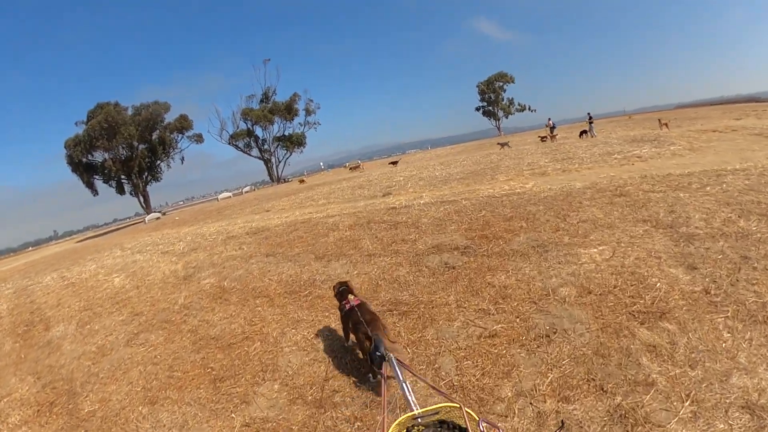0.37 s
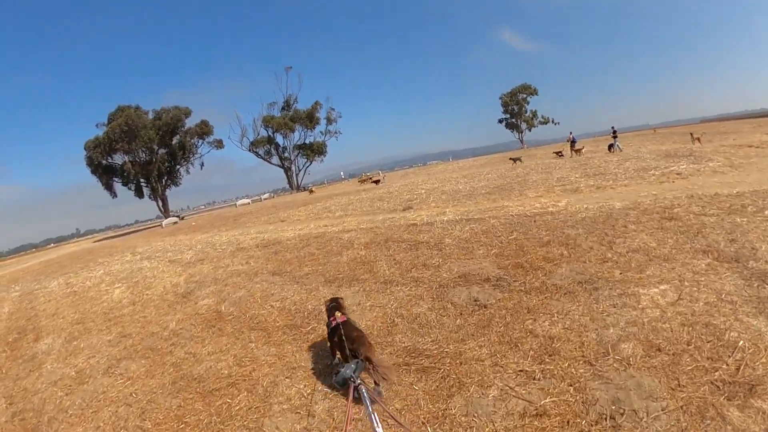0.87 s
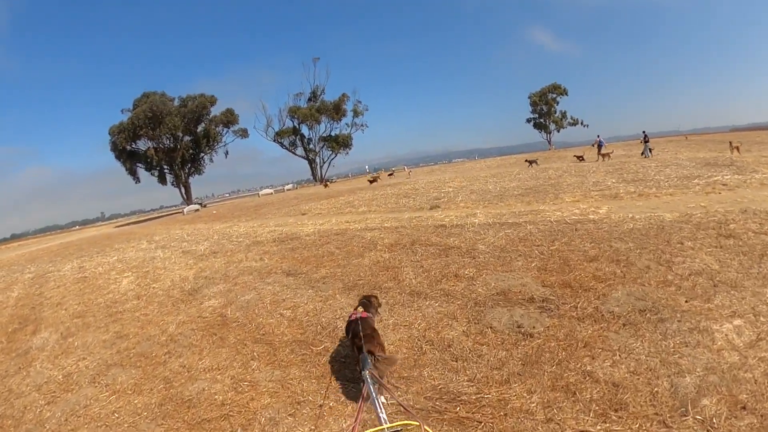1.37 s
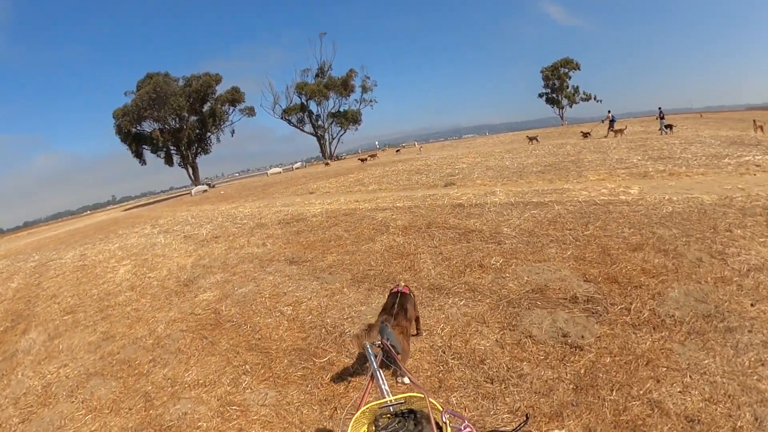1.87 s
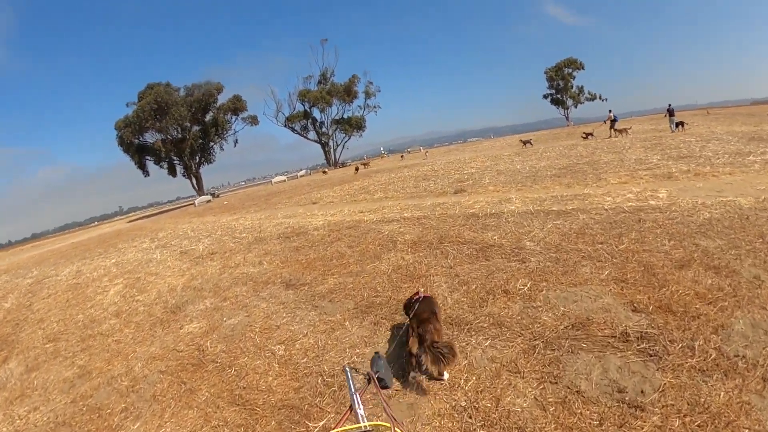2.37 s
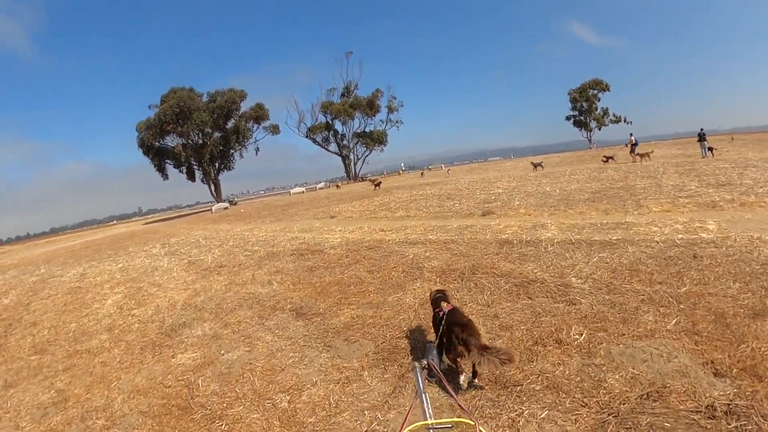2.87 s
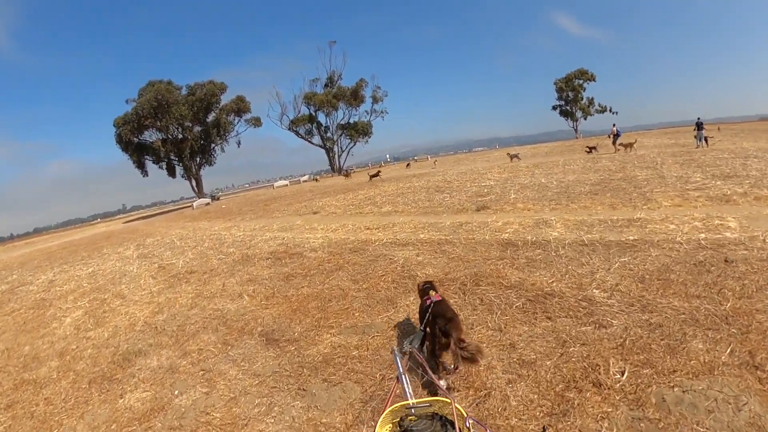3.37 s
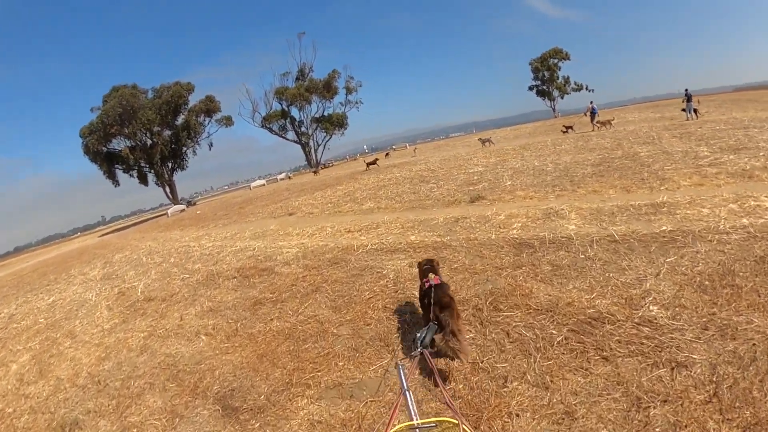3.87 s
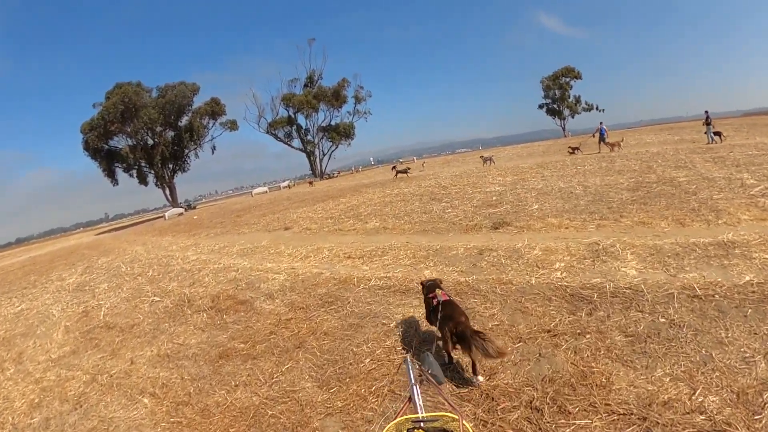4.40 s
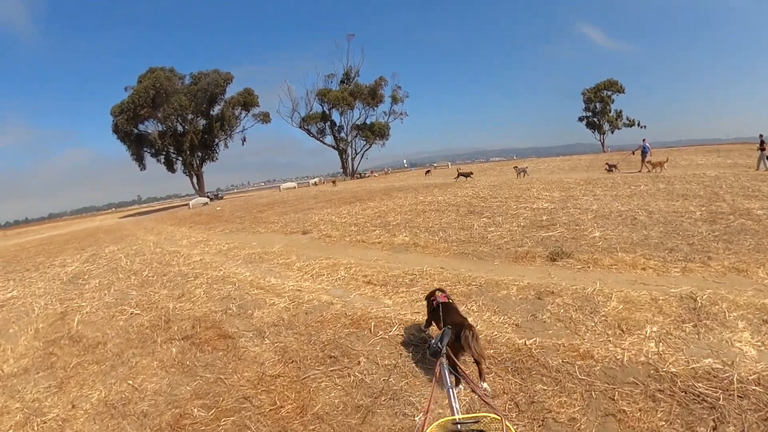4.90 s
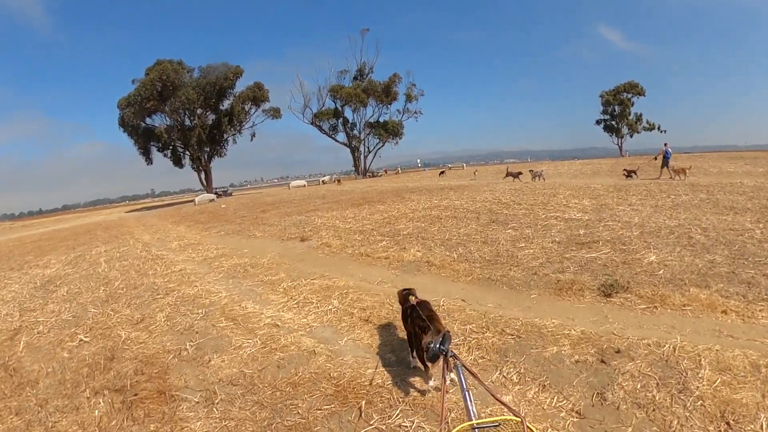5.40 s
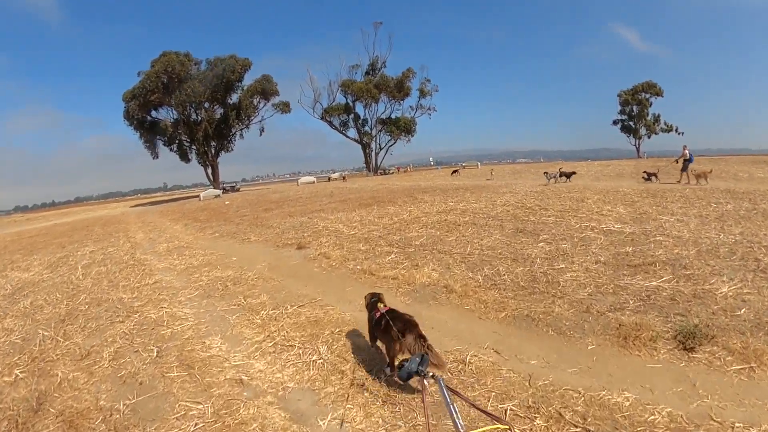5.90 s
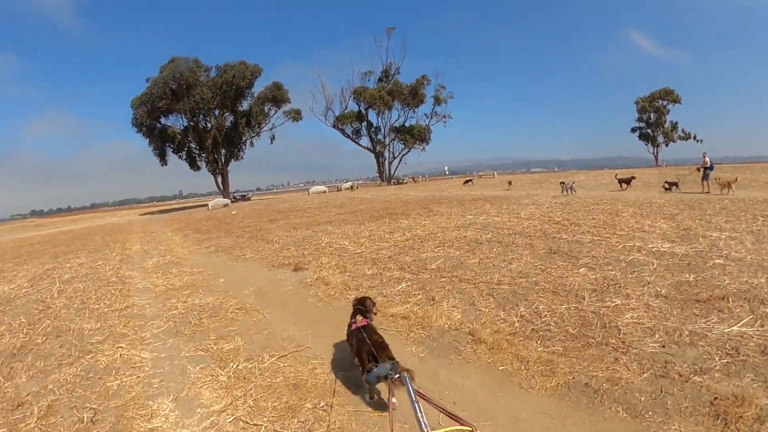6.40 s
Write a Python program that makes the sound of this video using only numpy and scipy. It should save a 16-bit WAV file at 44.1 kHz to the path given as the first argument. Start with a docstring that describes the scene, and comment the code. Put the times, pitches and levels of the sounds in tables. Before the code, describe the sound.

A dog-pulled bicycle rolls over dry grass: rumbling gusts, crisp crackles and scuffs, frame knocks, a brief faint hum and tiny metallic tinks.

```python
"""A small camera rides a bicycle pulled by a dog over dry grass, 6.5 s in the open.
Throughout: wind buffets the microphone (filtered noise under gust curves), tyres and paws rustle the
stubble (noisy grains), bumps knock and stalks snap (short noisy bursts into resonances).
From 3 s a narrow frame resonance hums for about a second (noise-driven); just before 4 s the ground
roughens and metal clips tink (flickering sines), once more at 5.6 s; gusts swell again at the end."""
import sys
import numpy as np
from scipy import signal
from scipy.fft import rfft, irfft, next_fast_len
from scipy.io import wavfile
from scipy.ndimage import uniform_filter1d

SR = 44100
rng = np.random.default_rng(int(sys.argv[2]) if len(sys.argv) > 2 else 0)


def elevation(decibels):
    """Turn decibel levels (scalar or array-like) into linear amplitude ratios."""
    levels = np.asarray(decibels, float)
    return 10 ** (levels / 20)


def unload_wav(signal):
    """Save mono or channel-first audio to the path in sys.argv[1] as 16-bit WAV at rate SR, clipped to [-1, 1]."""
    wavfile.write(
        sys.argv[1],
        SR,
        np.round(np.clip(np.atleast_2d(signal).T, -1, 1) * 32767).astype(np.int16),
    )


N = 287245
t = np.arange(N) / SR

# wind on the port: t/s, gust strength/dB (used relative to its mean)
GUST_DB = [(0, -28), (.07, -31), (.16, -22), (.22, -28), (.31, -20), (.37, -25), (.43, -20.5), (.5, -29),
           (.82, -30), (.87, -25), (1.1, -20), (1.23, -33), (1.34, -26), (1.52, -30.5), (1.64, -23.5),
           (1.72, -28), (1.96, -28.5), (2.23, -22), (2.33, -30), (2.59, -31), (2.99, -25), (3.17, -31),
           (3.4, -26), (3.75, -27.5), (3.93, -23), (4.42, -24), (4.47, -28.5), (4.66, -24), (5.33, -23),
           (5.55, -26.5), (5.64, -23), (6.05, -26.5), (6.2, -19.5), (6.31, -23), (6.39, -19), (6.51, -24)]
# lean of the wind toward small quick eddies: t/s, lean/dB
LEAN_DB = [(0, .5), (.85, .5), (1.1, -1), (1.6, -2.5), (2.0, 1), (2.6, -.5), (3.2, -.5), (3.5, 2),
           (3.75, -2.5), (3.95, 1.5), (5.6, 1), (6.05, -2), (6.25, 1.5), (6.51, -2.5)]
# deep buffet spectrum: f/Hz, relative level/dB
DEEP_SPECTRUM = [(5, -38.5), (12, -3.5), (25, 7), (45, 5.5), (60, 5.5), (75, -23.5), (120, -60)]
# quicker buffet spectrum: f/Hz, relative level/dB
UPPER_SPECTRUM = [(30, -44), (55, -7), (75, 3.5), (120, -1), (150, -7.5), (220, -15.5), (300, -25.5),
                  (450, -52), (900, -81.5)]
# ground roughness, as nominal shake of the mount: t/s, level/dB
GROUND_DB = [(0.0, -43.5), (0.27, -45.5), (0.54, -48.5), (0.8, -49.5), (1.01, -43), (1.16, -48.5),
             (1.72, -50.5), (2.1, -49.5), (2.65, -51.5), (3.79, -39), (4.86, -45), (5.0, -43),
             (5.26, -46.5), (5.51, -46.5), (5.69, -45), (5.8, -38.5), (5.93, -48), (6.51, -51.5)]
# paws and tyres through tufts: peak t/s, rustle level/dB, treble swish above it/dB, length/s
SCUFFS_DB = [(.08, -65, 1, .1), (0.258, -59, -3, 0.021), (.45, -70, -7, .1), (.62, -72.5, -6, 0.105),
             (0.852, -56, 4, 0.031), (1.0, -75, -10, 0.078), (1.125, -64, -17, 0.071),
             (1.315, -63, -8, 0.051), (1.403, -58.5, -6.5, 0.064), (1.69, -67.5, -2, 0.055),
             (1.978, -54.5, -16, 0.036), (2.31, -68, -4, 0.074), (2.553, -54, -8, .08),
             (2.87, -66, -4, .12), (3.29, -65, 0, .05), (3.345, -61, -2, 0.031), (3.46, -64, -1, .06),
             (3.953, -56.5, -9, 0.17), (4.106, -58, -3, 0.076), (4.275, -57, -11, 0.11),
             (4.426, -56.5, -2.5, 0.069), (4.59, -61.5, -10, 0.048), (4.94, -53, -2, 0.083),
             (5.06, -62, -9, .1), (5.16, -63, -5, .05), (5.3, -70, -6, .1), (5.43, -65, 2, .06),
             (5.59, -60.5, 2.5, 0.066), (5.74, -60, -9, .08), (5.81, -55, -5, .07), (6.15, -58, 3, .12),
             (6.239, -58.5, -17, 0.13)]
# mount shake spectrum: f/Hz, relative level/dB
SHAKE_SPECTRUM = [(120, -46.5), (280, 5), (450, 1.5), (720, -4), (950, -2.5), (1300, -6), (1750, -15.5),
                  (2000, -23.5), (2600, -33.5), (5000, -79)]
# stubble rustle spectrum: f/Hz, relative level/dB
RUSTLE_SPECTRUM = [(800, -43), (1800, 5.5), (3100, 2), (4200, -2.5), (5500, -14.5), (8000, -50)]
# treble swish spectrum: f/Hz, relative level/dB
SWISH_SPECTRUM = [(3000, -34), (5000, -1), (6500, -4.5), (8500, -11.5), (11000, -18), (13000, -36.5),
                  (15000, -76.5)]
# bumps through the frame: t/s, drive level/dB, hardness (high modes) above it/dB
KNOCK_EVENTS = [(.016, -40.5, 5.5), (.067, -41.5, -8), (.415, -32, 3), (.837, -46.5, 11), (.989, -54, 14),
                (1.06, -20, -8), (1.113, -40, 0), (1.767, -46, -4), (1.88, -44.5, 5), (1.916, -45, 6),
                (2.184, -53, 12.5), (2.231, -43, -3), (2.693, -42, -19.5), (3.018, -48, 1),
                (3.034, -31.5, -14), (3.38, -52.5, 14.5), (3.417, -41, 11), (3.547, -45, -9),
                (3.565, -39, -19), (3.616, -30.5, -12), (3.633, -36, -20), (3.67, -46, 3), (3.705, -48, 5),
                (3.724, -50, 12), (3.779, -46, 0), (3.796, -28, -1.5), (3.836, -32.5, -10),
                (3.88, -32.5, -20), (3.975, -40, -8), (3.997, -34, -4), (4.019, -30.5, -7),
                (4.097, -33, -17), (4.167, -44, 8.5), (4.262, -40, -5), (4.383, -40, 5.5), (4.509, -48, 9),
                (4.534, -47, 8), (4.864, -46, 3), (4.9, -47.5, 10), (4.937, -54, 19), (5.043, -40, -12),
                (5.148, -45.5, 8.5), (5.168, -38, -12), (5.504, -44.5, 5.5), (5.592, -41, -13),
                (5.809, -48, 11), (5.838, -33.5, 1.5), (5.952, -45.5, -3.5)]
# low frame modes: f/Hz, nominal width/Hz, relative level/dB
FRAME_LOW_MODES = [(214, 52, -0.5), (336, 110, -1.5), (412, 54, 0.5), (523, 140, 0.5), (690, 560, -3)]
# high frame modes: f/Hz, nominal width/Hz, relative level/dB
FRAME_HIGH_MODES = [(955, 81, 18.5), (1161, 276, 24), (1400, 400, -22.5), (1750, 300, -29)]
# louder stalks snapping: t/s, drive level/dB, body above it/dB, brightness above it/dB
SNAP_EVENTS = [(.0677, -59, 1, -3), (.0907, -54.5, -13, 1), (.1705, -59.5, 10, -4), (.2613, -48, 7.5, 4.5),
               (.605, -56, -2, -11), (.6508, -51, -2, -9), (.7727, -55.5, -3, -10), (.8135, -63, 0, -14),
               (.838, -39.5, -2, -24), (.8491, -49, -5, 5.5), (.8542, -40, -1.5, -3), (.8614, -45, -3, -7),
               (.917, -55, 1, -14), (.9428, -54, -7, -13), (.9577, -51, -6, -14), (.992, -57, 7, -10),
               (1.0776, -50, -9, -1), (1.1623, -55, 3, -26), (1.3064, -53, 0.5, -2.5),
               (1.3842, -50.5, -3, -14.5), (1.4028, -45, -2.5, -10), (1.4093, -46, -7, -9),
               (1.518, -66, 12, 4), (1.551, -55.5, -11, -13), (1.6273, -56, -6, -10),
               (1.9693, -49.5, -2, -12), (2.5411, -41, -12, -12), (2.5445, -38.5, 2.5, -26),
               (2.5544, -55, 0, -9), (2.563, -54, -10, -11), (2.5807, -52, -5, -12),
               (2.604, -54, -3, -13.5), (2.9627, -58, -7, -3), (3.0933, -59, -2, -1), (3.119, -59, -9, 9),
               (3.333, -46, 1, -10.5), (3.379, -53.5, 10, -15), (3.424, -53.5, -1, -12.5),
               (3.494, -49.5, -5, -7), (3.5915, -60, 8, -9), (3.6127, -58, 5, -12), (3.7955, -57, 9, 3),
               (3.8374, -60, 3, 0), (3.877, -62, 6, 4), (3.922, -46.5, -8, -.5), (3.9644, -51, -8, -10),
               (3.9881, -54, -1, -6), (4.119, -50.5, -10, -13), (4.3789, -58, 15.5, -2),
               (4.4046, -45.5, -1, -10), (4.5466, -60, 1, -13), (4.5687, -57, -1, -13),
               (4.937, -37.5, 0.5, -5.5), (5.0013, -49, -9, -22), (5.041, -60, 2, -7),
               (5.0692, -51.5, 3, -17), (5.115, -43, -15, -12), (5.1488, -44, -1.5, -14),
               (5.2025, -58, 0, -8), (5.2589, -55.5, 0, -5), (5.377, -62, -5, 8.5), (5.4211, -58.5, -1, -1),
               (5.685, -59, 4, -11), (5.7944, -47, 7, -9), (5.8105, -46, -1, -3), (5.8676, -55, -5, -10),
               (5.906, -48, -2, -7), (5.9549, -59.5, 7, -2), (5.9893, -56, -2, -3), (6.1337, -60, 0, 3),
               (6.155, -58, -5, 5)]
# middle camera case modes: f/Hz, nominal width/Hz, relative level/dB
CASE_MIDDLE_MODES = [(2680, 360, -3), (3076, 330, 1.5), (3650, 450, -0.5), (4340, 1760, -4.5)]
# camera case body modes: f/Hz, nominal width/Hz, relative level/dB
CASE_BODY_MODES = [(950, 260, -10), (1280, 300, -3.5), (1450, 210, 4), (1630, 180, 7.5)]
# high camera case modes: f/Hz, nominal width/Hz, relative level/dB
CASE_HIGH_MODES = [(5270, 2400, 10), (6330, 2200, 4.5), (8200, 2200, -14), (10800, 2500, -14.5)]
# metal clips: t/s, ring f/Hz, level before flicker/dB, length/s
TINK_EVENTS = [(3.942, 8580, -66, .055), (3.972, 2160, -56, 0.034), (4.103, 7960, -64, .04),
               (4.125, 11250, -67, .045), (4.128, 12810, -78, .045), (5.586, 1846, -54, 0.044)]


def wind():
    """Eddies over the port: a deep buffet and a quicker, flickering one above it."""
    gust_db, = columns(GUST_DB)
    lean_db, = columns(LEAN_DB)
    deep_db = follow(gust_db, at_mean_db=-25.3, slope=.9) - lean_db
    upper_db = follow(gust_db, at_mean_db=-26.7, slope=1.01) + lean_db + 0.56 * walk(25)
    deep = shaped(rng.standard_normal(N), DEEP_SPECTRUM)
    upper = shaped(rng.standard_normal(N), UPPER_SPECTRUM)
    return deep * elevation(deep_db) + upper * elevation(upper_db)


def rolling():
    """Small jolts shake the mount, tyres and paws crackle through stalks; both follow the uneven ground."""
    scuff_jolt_db = 10.5
    ground_db, = columns(GROUND_DB)
    brush, swish = scuffs()
    unevenness = walk(21.89)

    jolts = shaped(grains(400, spread_db=3.5, hiss=1.3), SHAKE_SPECTRUM)
    shake = patchy(jolts, 120 * 1.5 ** np.arange(10), patchy_db=3.0, rate_hz=18)
    shake *= elevation(1.1 * unevenness + 0.49 * walk(40))

    stalks, tips = (grains(1200, spread_db=3.0, hiss=1.8) * elevation(0.81 * unevenness + 1.7 * walk(60))
                    for _ in range(2))
    rustle = patchy(shaped(stalks, RUSTLE_SPECTRUM), 800 * 1.6 ** np.arange(6), patchy_db=3.0, rate_hz=33)
    treble = shaped(0.74 * stalks + tips, SWISH_SPECTRUM)

    # steady part and scuffs add in power
    shake_gain = np.hypot(elevation(ground_db), elevation(scuff_jolt_db) * brush)
    rustle_gain = np.hypot(elevation(follow(ground_db, at_mean_db=-66, slope=0.61)), brush)
    treble_gain = np.hypot(elevation(follow(ground_db, at_mean_db=-74.5, slope=.9)), swish)
    return shake * shake_gain + rustle * rustle_gain + treble * treble_gain


def scuffs():
    """Gain curves of rustle and treble swish for brushed tufts: a quick rise, a slower fall."""
    rise_share = .4  # of the fall time
    peak_s, rustle_db, swish_db, length_s = np.transpose(SCUFFS_DB)[:, :, None]
    coarse_s = t[::32]
    time_constant_s = length_s / 2 * np.where(coarse_s < peak_s, rise_share, 1)
    swell = np.exp(-np.abs(coarse_s - peak_s) / time_constant_s)
    return [np.interp(t, coarse_s, np.linalg.norm(elevation(level_db) * swell, axis=0))
            for level_db in (rustle_db, rustle_db + swish_db)]


def knocks():
    """Dull bumps carried up the frame, ringing its modes."""
    return blows(KNOCK_EVENTS, [FRAME_LOW_MODES, FRAME_HIGH_MODES], t60_s=.03, t60_s_per_db=.0002,
                 first=6.05, lumpy_db=1.0, rise_s=0.00147, contact_s=.0002, lag_s=0.00091)


def snaps():
    """Dry stalks breaking, coloured by the camera case; 30 faint ones fall at random."""
    faint_count, scatter_db = 30, 2.5
    mean_db = (-65, 0, -8.5)  # drive, body, brightness
    faint_s = rng.random(faint_count) * t[-1]
    faint_db = mean_db + scatter_db * rng.standard_normal((faint_count, 3))
    events = [*SNAP_EVENTS, *np.c_[faint_s, faint_db]]
    return blows(events, [CASE_MIDDLE_MODES, CASE_BODY_MODES, CASE_HIGH_MODES], t60_s=.019,
                 t60_s_per_db=.0002, first=2, lumpy_db=4.3, rise_s=.0008, contact_s=.00002, lag_s=.0001)


def tinks():
    """Metal clips: short thin sine rings, held for a moment with a flickering level as they chatter."""
    out = np.zeros(N)
    for start_s, f_hz, level_db, length_s in TINK_EVENTS:
        progress = np.clip((t - start_s) / length_s, 0, 1)
        envelope = np.sin(np.pi * progress ** 0.52) ** 0.44
        out += elevation(level_db + 3.2 * walk(130)) * envelope * np.sin(2 * np.pi * f_hz * t)
    return out


def hum():
    """A narrow resonance of the frame, driven by noise and gated to about a second."""
    start_s, end_s, attack_s, release_s, level_db = 2.97, 3.95, 0.088, .1, -43
    mode = (289, 11, 0)  # f/Hz, nominal width/Hz, level/dB
    tone = unit(ring(rng.standard_normal(N), [mode]))
    gate = np.clip(np.minimum((t - start_s) / attack_s, (end_s - t) / release_s), 0, 1)
    return tone * gate * elevation(level_db)


def blows(events, parts, t60_s, t60_s_per_db, first, lumpy_db, rise_s, contact_s, lag_s):
    """Each event drives the mode groups, by its colour, with a first click and a lumpy fading tail."""
    count = len(parts)
    drive = np.zeros((count, N + 8192))
    tau = np.arange(4096) / SR
    mean_db = np.mean([e[1] for e in events])
    for start_s, level_db, *colour_db in events:
        # a stronger blow goes on longer
        tail_s = max(t60_s + t60_s_per_db * (level_db - mean_db), .004)
        fade = (1 - np.exp(-tau / rise_s)) * np.exp(-np.log(1000) * tau / tail_s)
        # many small contacts of uneven size; each part sees different ones
        lumps = elevation(lumpy_db * np.repeat(rng.standard_normal((count, 64)), 64, axis=1))
        burst = lumps * rng.standard_normal((count, 4096)) * fade
        # tail energy does not depend on the lumps
        burst *= np.linalg.norm(fade) / np.linalg.norm(burst, axis=1, keepdims=True)
        burst[:, int(rise_s * SR)] += first
        i = int(start_s * SR)
        part_db = level_db + np.array([0, *colour_db])
        drive[:, i:i + 4096] += burst * elevation(part_db)[:, None]
    # a softer contact is a longer push, with less treble; the first part arrives late
    lag = lag_s * (np.arange(count) == 0)[:, None]
    push = np.exp(-.5 * ((tau[:512] - 4 * contact_s - lag) / contact_s) ** 2)
    drive = signal.fftconvolve(drive, push / push[1].sum(), axes=1)
    return sum(ring(d, modes) for d, modes in zip(drive, parts))


def ring(x, modes):
    """Sum of resonances that swell in over a moment, scaled so that a single click peaks at 1."""
    tau = np.arange(2048) / SR
    body = np.zeros(2048)
    for f_hz, width_hz, level_db in modes:
        decay = np.exp(-np.pi * width_hz * tau)
        swell = 1 - np.exp(-3.5 * np.pi * width_hz * tau)
        body += elevation(level_db) * width_hz * decay * swell * np.sin(2 * np.pi * f_hz * tau)
    return signal.fftconvolve(x, body / np.max(np.abs(body)))[:N]


def grains(rate_hz, spread_db, hiss):
    """Sparse clicks of very uneven size over a share of smooth noise."""
    size_db = spread_db * np.minimum(rng.exponential(size=N), 4)
    clicks = (rng.random(N) < rate_hz / SR) * rng.standard_normal(N) * elevation(size_db)
    return unit(clicks) + hiss * rng.standard_normal(N)


def patchy(x, edges_hz, patchy_db, rate_hz):
    """Let each band between the edges swell and sink on its own."""
    size = next_fast_len(N)
    spectrum = rfft(x, size)
    f_hz = np.arange(size // 2 + 1) * SR / size
    out = np.zeros(N)
    for low_hz, high_hz in zip(edges_hz[:-1], edges_hz[1:]):
        band = irfft(spectrum * (f_hz >= low_hz) * (f_hz < high_hz), size)[:N]
        out += band * elevation(patchy_db * walk(rate_hz))
    return out


def shaped(x, spectrum):
    """Colour a noisy sound with a (f/Hz, level/dB) spectrum, silent beyond its ends; rms 1."""
    hz, db = np.transpose(spectrum)
    size = next_fast_len(N)
    f_hz = np.arange(size // 2 + 1) * SR / size + 1  # +1 keeps the log finite
    gain = elevation(np.interp(np.log(f_hz), np.log(hz), db)) * (f_hz > hz[0]) * (f_hz < hz[-1])
    return unit(irfft(rfft(x, size) * gain, size)[:N])


def walk(rate_hz):
    """Random levels held 1 / rate_hz and smoothed twice; rms 1."""
    k = int(SR / rate_hz)
    held = np.repeat(rng.standard_normal(N // k + 1), k)
    return unit(uniform_filter1d(uniform_filter1d(held, k), k)[:N])


def follow(control_db, at_mean_db, slope):
    """Level/dB of a layer that moves by slope dB per dB of a control."""
    return at_mean_db + slope * (control_db - control_db.mean())


def columns(table):
    """Table columns as curves over every sample."""
    s, *cols = np.transpose(table)
    return [np.interp(t, s, c) for c in cols]


def unit(x):
    """Scale to rms 1."""
    return x / np.sqrt(np.mean(x ** 2))


def scene():
    """Everything reaches the one microphone in the open, without echoes."""
    return (wind() + rolling() + knocks() + snaps() + tinks() + hum())[None]


def low_pass(x):
    """Removes everything above the highest recorded frequency."""
    return signal.sosfilt(signal.butter(12, 14200, fs=SR, output="sos"), x)


def record(dry):
    """The loudest swings are rounded off toward a ceiling of 0.42 of full scale."""
    ceiling = .42
    mix = ceiling * np.tanh(dry / ceiling)
    return low_pass(mix)


dry = scene()
out = record(dry)
unload_wav(out)
```